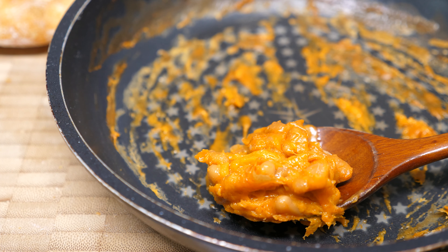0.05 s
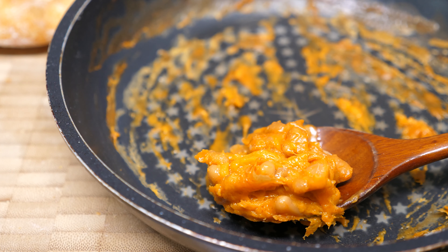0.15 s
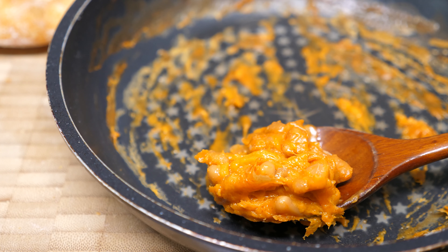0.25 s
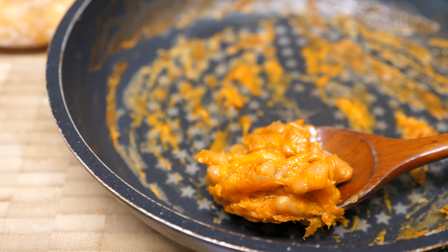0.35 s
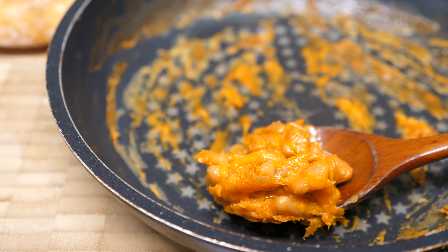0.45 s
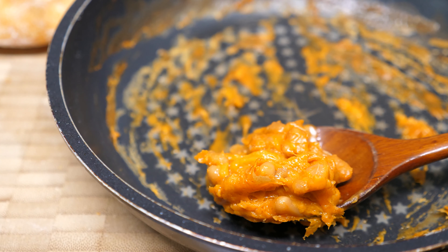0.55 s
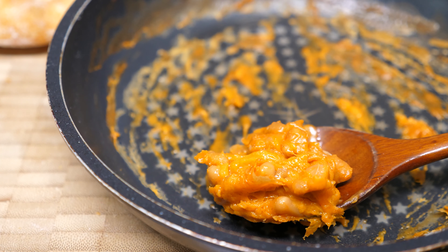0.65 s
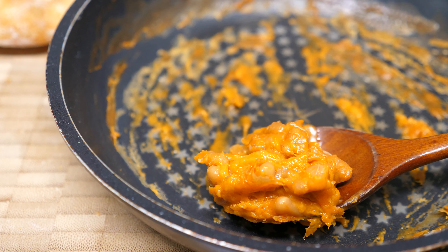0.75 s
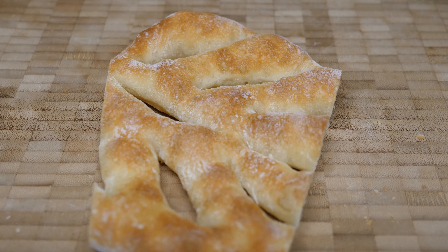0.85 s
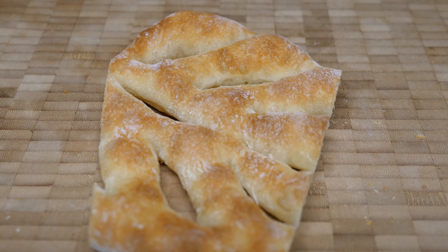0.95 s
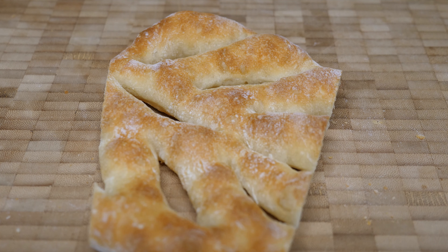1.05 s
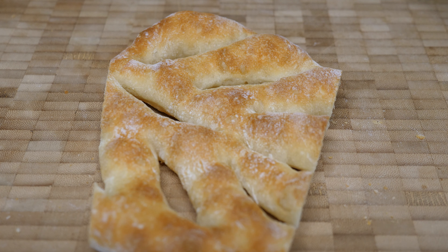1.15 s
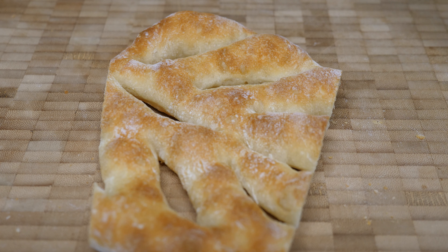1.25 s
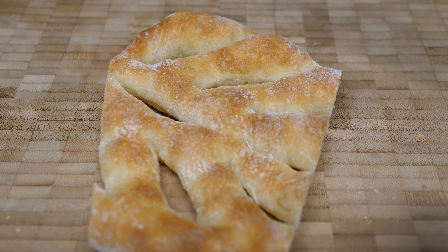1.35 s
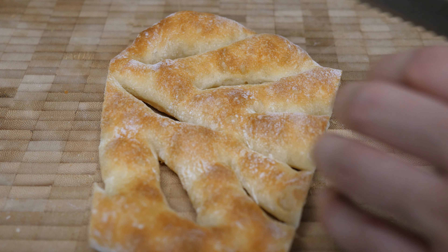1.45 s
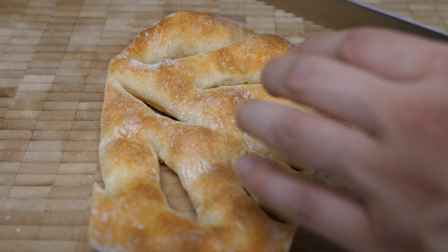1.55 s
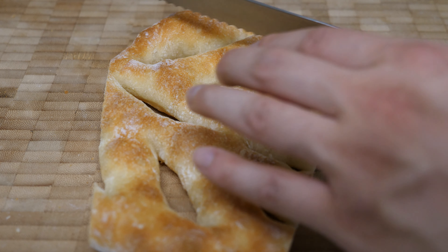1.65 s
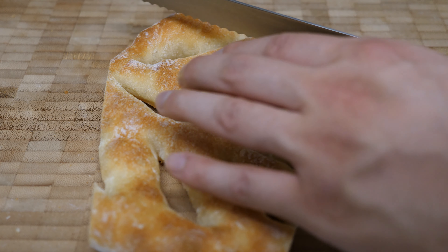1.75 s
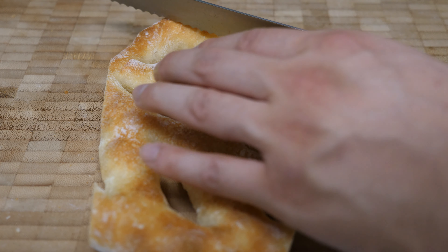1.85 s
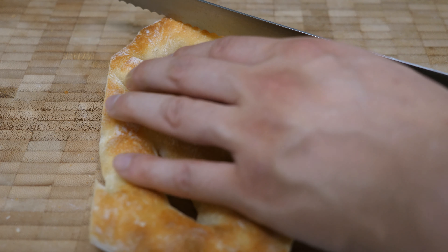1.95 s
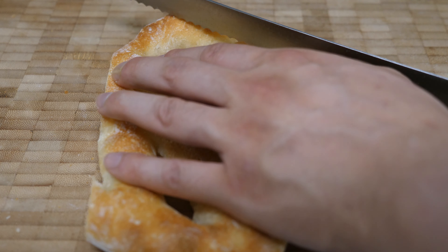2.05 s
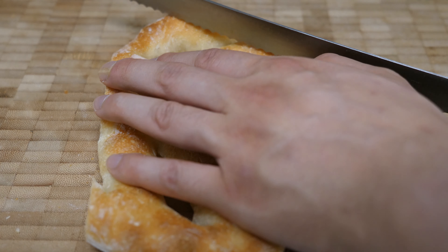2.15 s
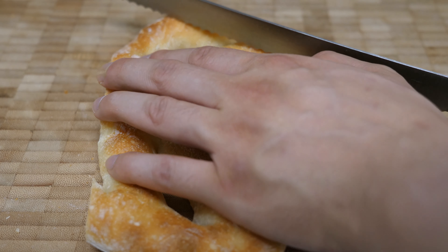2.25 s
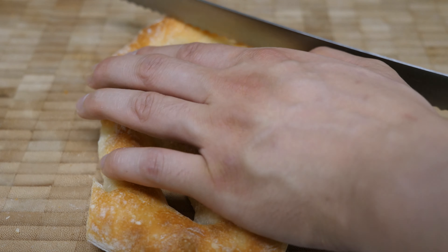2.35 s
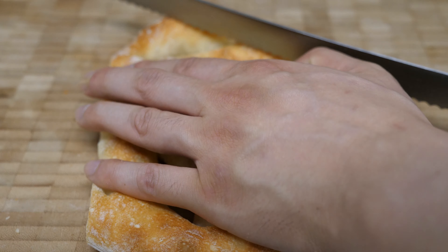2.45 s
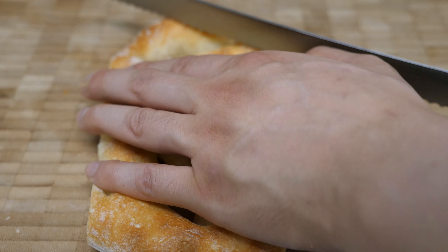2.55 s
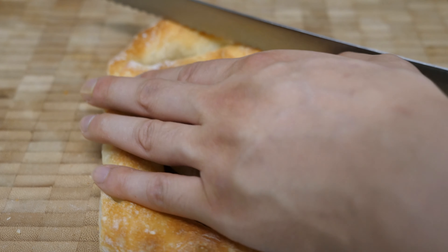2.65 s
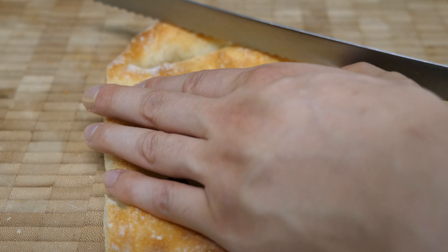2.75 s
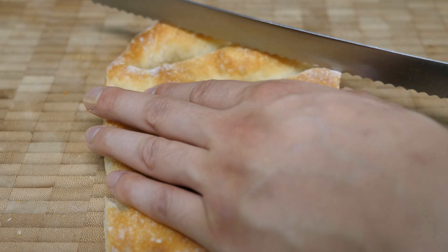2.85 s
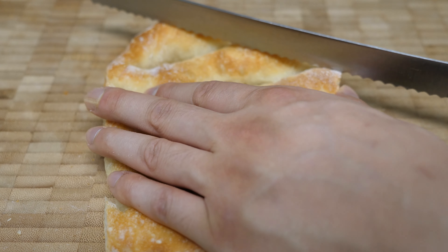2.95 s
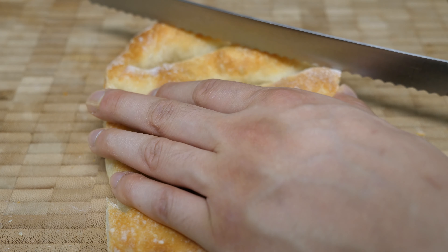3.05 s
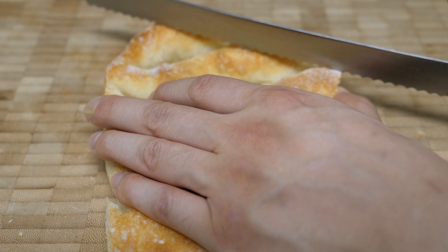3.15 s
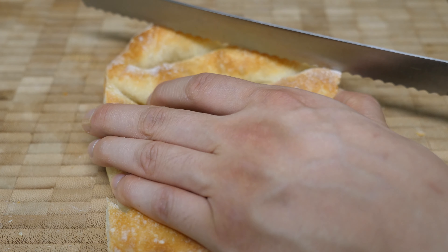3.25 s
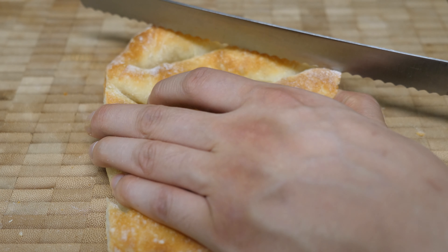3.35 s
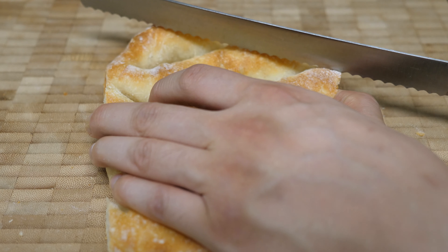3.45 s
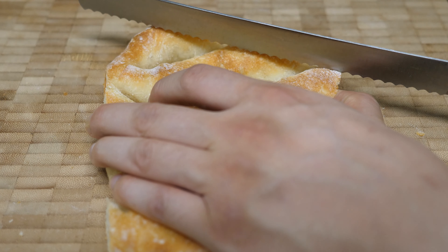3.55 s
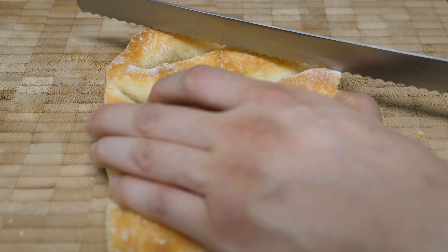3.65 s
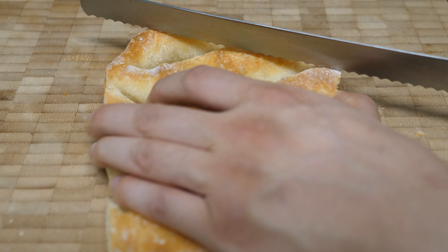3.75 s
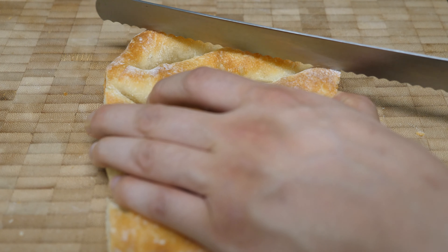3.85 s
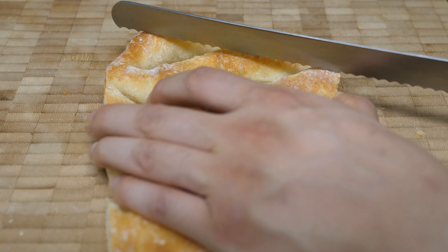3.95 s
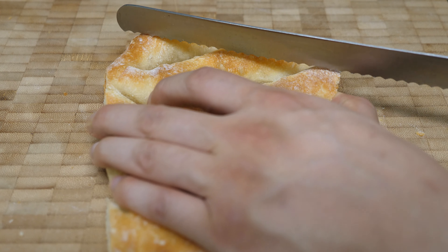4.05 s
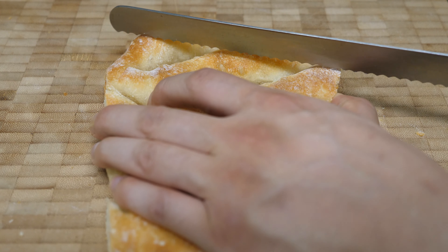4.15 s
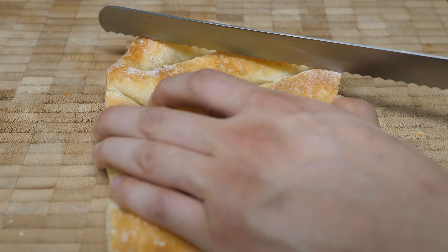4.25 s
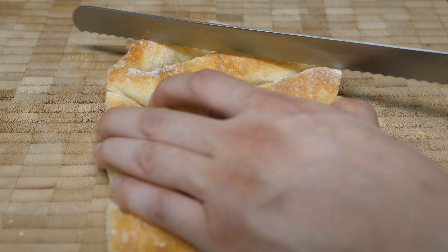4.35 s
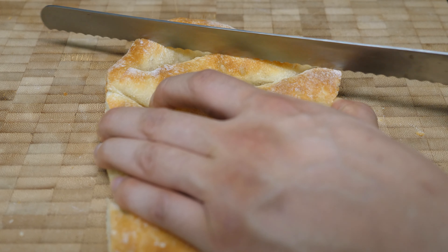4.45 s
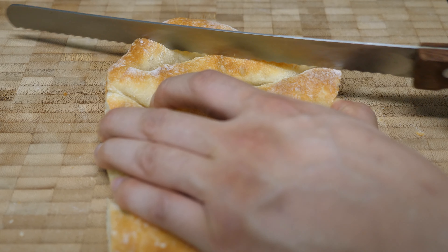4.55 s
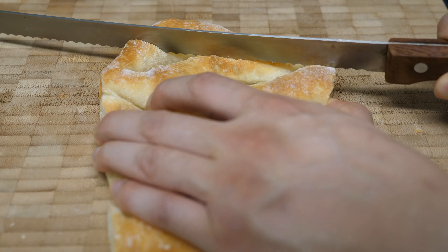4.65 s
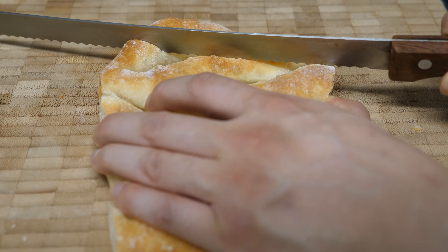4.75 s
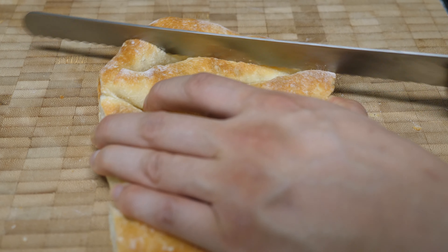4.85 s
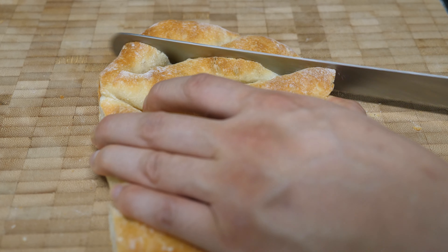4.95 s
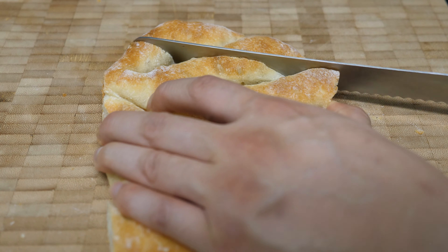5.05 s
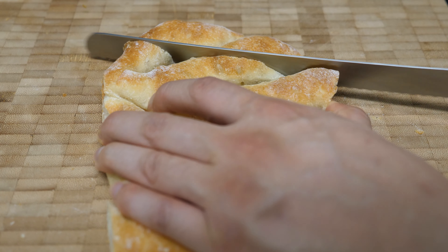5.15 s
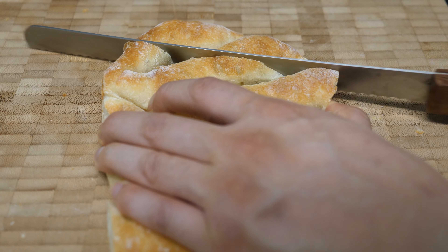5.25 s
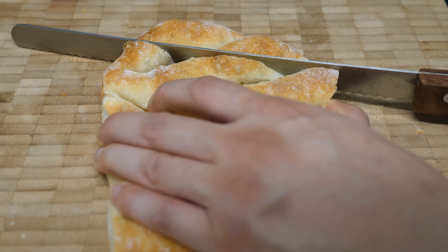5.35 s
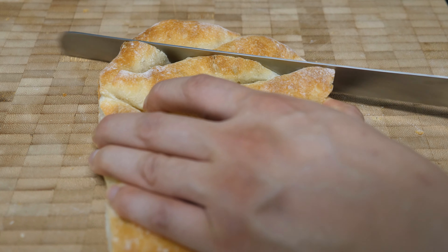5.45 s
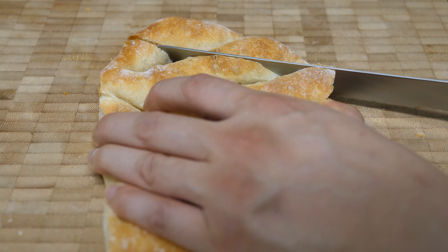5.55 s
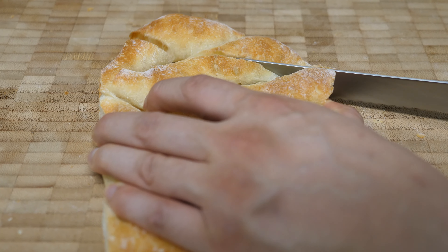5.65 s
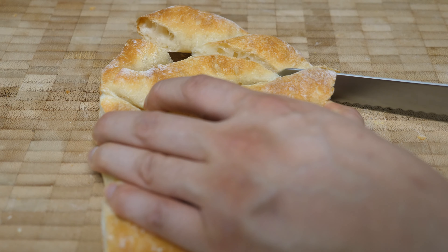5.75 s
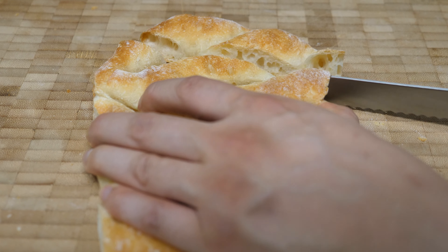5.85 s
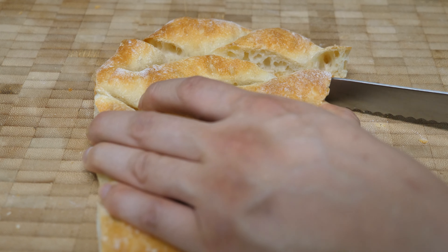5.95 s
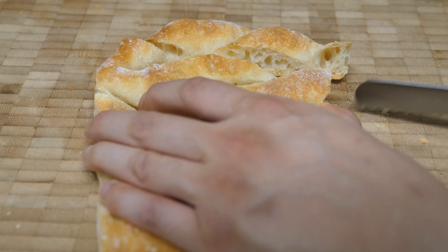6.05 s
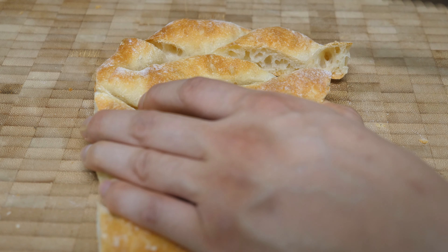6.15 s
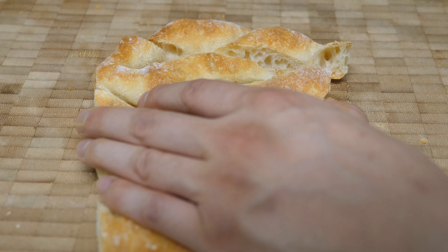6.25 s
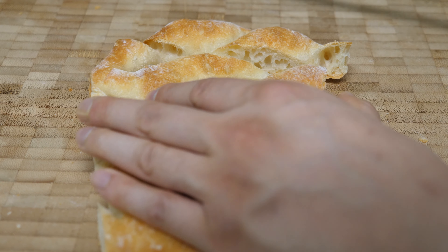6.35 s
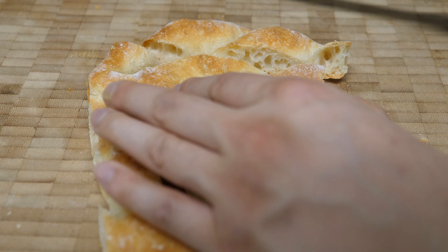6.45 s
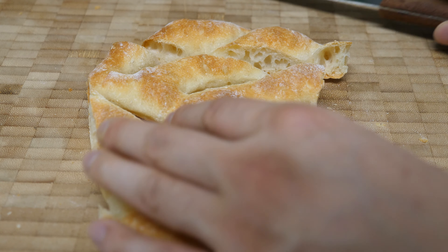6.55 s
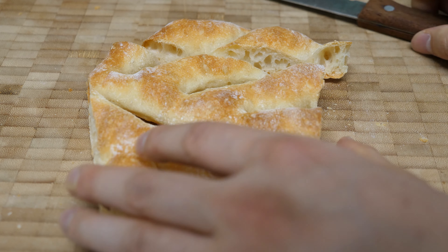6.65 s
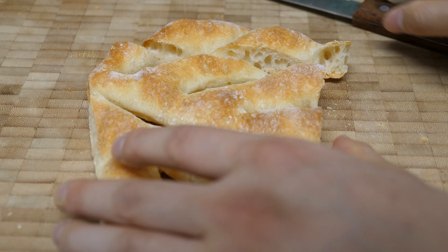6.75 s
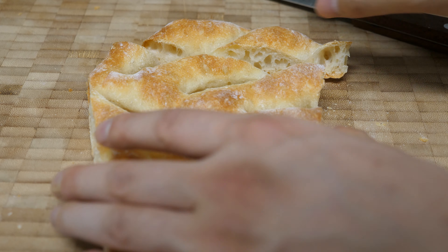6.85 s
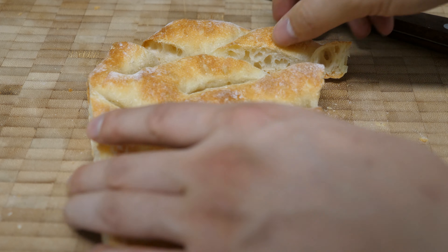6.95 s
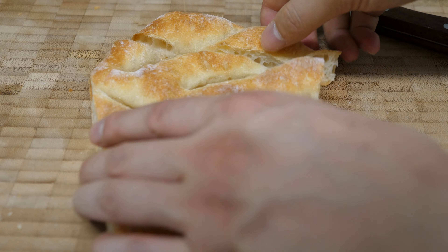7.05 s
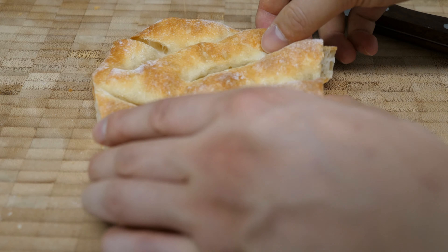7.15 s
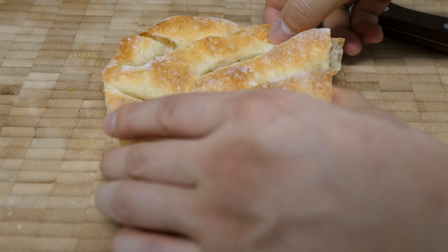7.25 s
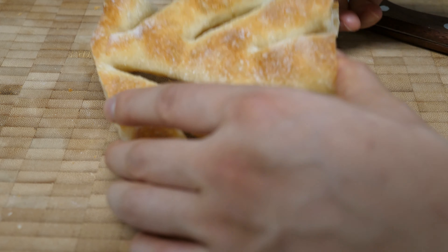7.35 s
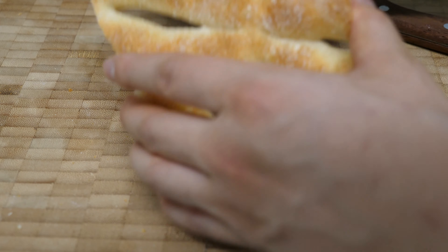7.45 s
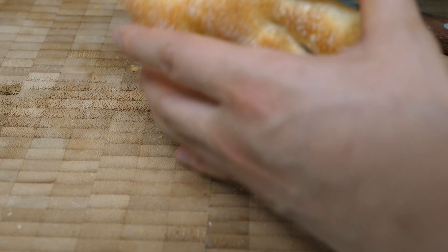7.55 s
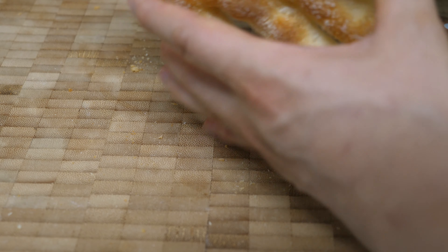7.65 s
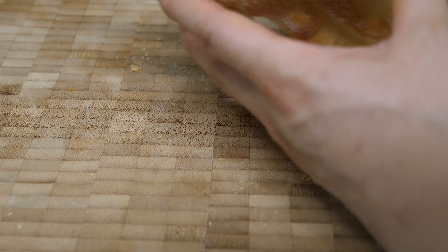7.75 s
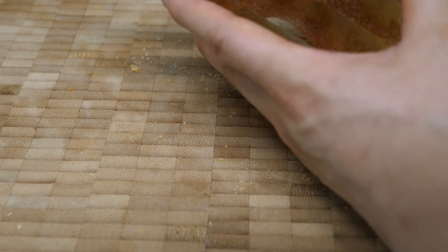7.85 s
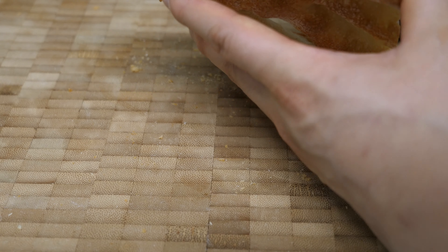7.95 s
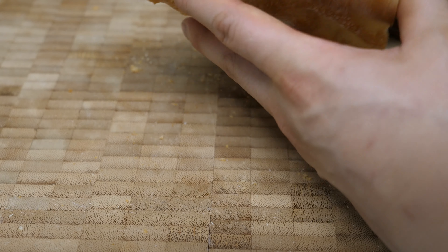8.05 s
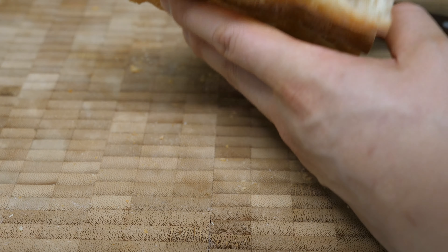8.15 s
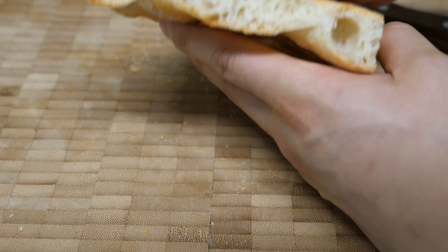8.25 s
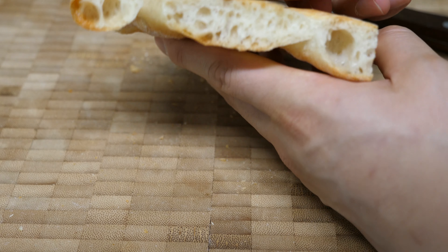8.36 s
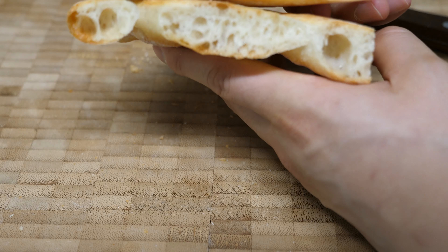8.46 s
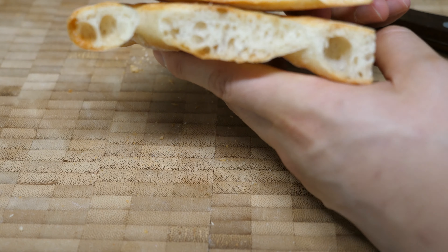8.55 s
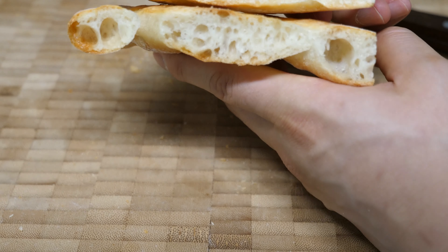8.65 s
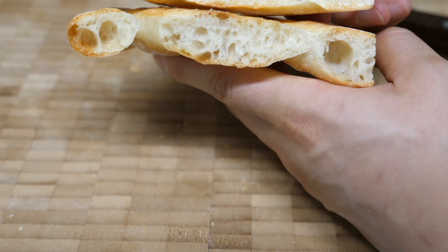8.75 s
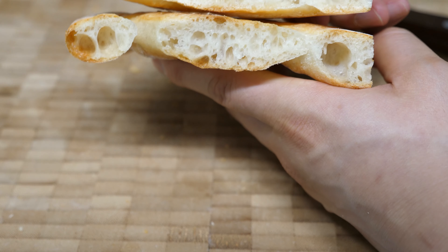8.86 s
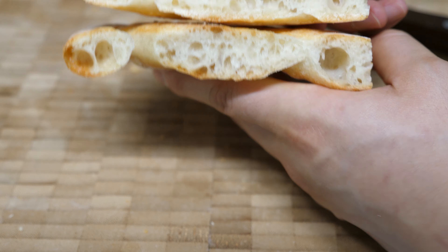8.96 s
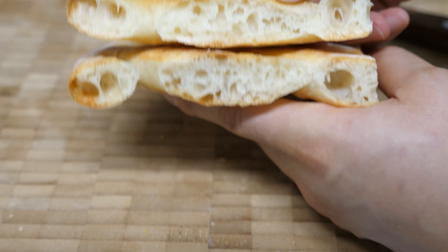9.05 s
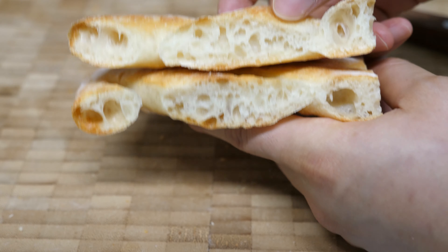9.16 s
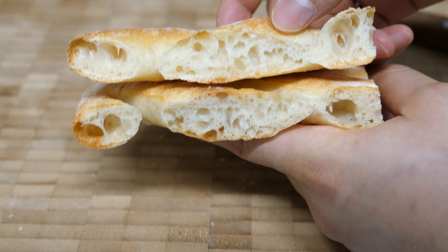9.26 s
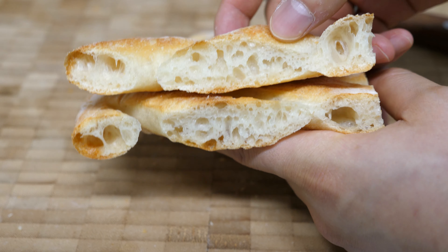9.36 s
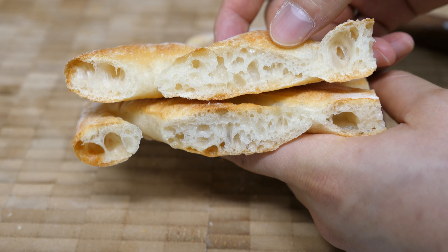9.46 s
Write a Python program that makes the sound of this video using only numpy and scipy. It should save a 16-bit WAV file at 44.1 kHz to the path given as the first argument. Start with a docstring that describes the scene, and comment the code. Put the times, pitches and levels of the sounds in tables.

```python
"""Cutting a crisp flat loaf

A serrated knife saws through a crisp flat loaf on a wooden board, close to the microphone.
A hand settles on the bread, the teeth scuff and bite, and the crust crackles through a few strokes: random
fractures ring as flakes, loaf and blade. The knife clatters down as struck modes and the halves rustle as they
are picked up, in crackle shaped by hand. A small kitchen answers with a noise tail, over a faint hum and hiss."""
import sys
import numpy as np
from scipy import signal
from scipy.fft import rfft, irfft, next_fast_len
from scipy.io import wavfile
from scipy.ndimage import map_coordinates

SR = 44100
rng = np.random.default_rng(int(sys.argv[2]) if len(sys.argv) > 2 else 0)


def generate_wav(signal):
    """Clip the signal to [-1, 1] and save it as 16-bit WAV at the path in sys.argv[1]."""
    frames = np.transpose(np.atleast_2d(signal))
    scaled = np.clip(frames, -1, 1) * 32767
    pcm = np.round(scaled).astype(np.int16)
    wavfile.write(sys.argv[1], SR, pcm)


N = 418490

# All spectra and resonance tables give relative levels; the sound they colour is levelled afterwards.
# Rumble of the wooden board. Each row: frequency in Hz, density in dB per Hz.
BOARD_SPECTRUM = [(20, -19.5), (45, -14), (78, -2), (110, -10.5), (200, -11), (500, -38), (2000, -82)]
# Sharp crack of breaking crust. Each row: frequency in Hz, density in dB per Hz.
CRACK_SPECTRUM = [(200, -32.5), (1000, -9.5), (2400, 5.5), (4000, 2), (6500, -1), (9000, -1.5),
                  (10800, -9.5), (13000, -5), (16000, -15)]
# Resonances of the serrated blade. Each row: frequency in Hz, width in Hz, strength in dB.
TEETH_MODES = [(4456, 120, 3), (5430, 79, -8), (6760, 170, -1), (9020, 320, -2), (12300, 350, -7)]


def amp(db):
    """Decibels to gain."""
    return 10 ** (np.asarray(db) / 20)


def unit(x):
    """x at rms 1."""
    return x / np.sqrt(np.mean(x ** 2) + 1e-20)


def seconds(size):
    """A time axis of this many samples."""
    return np.arange(size) / SR


def along(points, hz):
    """Read (Hz, value) points on a log frequency axis."""
    f, v = np.transpose(points)
    return np.interp(np.log(hz + 1), np.log(f + 1), v)


def wobble(rate):
    """A smooth random curve, rate knots a second."""
    knots = rng.standard_normal(int(N * rate / SR) + 4)
    return map_coordinates(knots, [seconds(N) * rate])


def add(track, s, sound):
    """Mix a sound into the track at s seconds."""
    part = track[round(s * SR):][:len(sound)]
    part += sound[:len(part)]


def colour(x, spectrum, size=8192):
    """x through the causal minimum-phase filter with this spectrum."""
    cepstrum = irfft(np.log(amp(along(spectrum, np.fft.rfftfreq(size, 1 / SR)))))
    # folding the cepstrum forward in time makes the filter causal
    cepstrum[1:size // 2] *= 2
    cepstrum[size // 2 + 1:] = 0
    impulse = irfft(np.exp(rfft(cepstrum)))
    return signal.fftconvolve(x, impulse)[:len(x)]


def noise(spectrum):
    """Coloured noise of rms 1."""
    return unit(colour(rng.standard_normal(N), spectrum))


def opening(hit):
    """A hit at rms 1 over its first 4 ms."""
    return hit / np.sqrt(np.mean(hit[:SR // 250] ** 2))


def scatter(scatter_db, t60):
    """An impulse and its dense reflections from hand, board and loaf, down 60 dB after t60 seconds."""
    t = seconds(SR // 3)
    tail = rng.standard_normal(len(t)) * amp(-60 * t / t60)
    return (t == 0) + amp(scatter_db) * tail / np.linalg.norm(tail)


def blow(spectrum, scatter_db, t60):
    """One short hit with this colour."""
    return opening(colour(scatter(scatter_db, t60), spectrum))


def ringing(modes, vary_db):
    """Damped modes, each at a new strength and sign; a wider mode dies sooner."""
    t = seconds(SR // 3)
    total = 0
    for hz, width, db in modes:
        strength = amp(db + vary_db * rng.normal()) * rng.choice([-1, 1])
        total = total + strength * np.exp(-np.pi * width * t) * np.sin(2 * np.pi * hz * t)
    return total


def fractures(rate, spread_db):
    """Random impulses, rate a second: many small ones, a few large."""
    size = amp(spread_db * np.minimum(rng.exponential(size=N), np.pi))
    breaks = rng.random(N) < rate / SR
    return unit(breaks * size * rng.choice([-1, 1], N) / np.sqrt(rate))


def crackle(rate, spread_db, count=12):
    """Flakes of many sizes break; each rings for a cycle at its own pitch and scatters along its own paths."""
    t = seconds(SR // 100)
    flakes = 0
    for hz in np.geomspace(1200, 14000, count):
        cycle = np.cos(2 * np.pi * hz * t) * np.exp(-t * hz)
        ring = signal.fftconvolve(cycle, scatter(2, t60=.025))[:SR // 30]
        flakes = flakes + signal.oaconvolve(fractures(rate / count, spread_db), ring * hz)[:N]
    return unit(flakes)


def swept(x, centre_hz, boost_db, octaves):
    """x through a broad resonance whose centre moves, one value per sample."""
    hz, t, z = signal.stft(x, SR, nperseg=1024)
    away = np.log2((hz[:, None] + 1) / np.interp(t, seconds(N), centre_hz)) / octaves
    boosted = z * amp(boost_db * np.exp(-away ** 2))
    return unit(signal.istft(boosted, SR, nperseg=1024)[1][:N])


def swell(start, rise, hold, fall, db, change_db):
    """The gain of one movement: it gathers force, holds while drifting by change_db, and dies away."""
    depth_db, rise_curve, fall_curve = 34.5, 1.9, 1.12  # the rise flattens, the fall steepens
    t = seconds(N) - start
    rising = np.maximum(1 - t / rise, 0) ** rise_curve
    falling = (np.maximum(t - rise - hold, 0) / fall) ** fall_curve
    held_db = db + change_db * np.clip((t - rise) / hold, 0, 1)
    return amp(np.maximum(held_db - depth_db * (rising + falling), -200))


def background():
    """An appliance hums in the low murk of the room, under a thin hiss."""
    # Each row: time in seconds, hiss level in dB rms.
    hiss_level = [(.912, -96), (.918, -68), (1.4, -65.5), (1.55, -70), (8.7, -71.5), (9.1, -70)]
    # Each row: frequency in Hz, density in dB per Hz; first the hiss, then the murk.
    hiss_spectrum = [(700, -48.5), (2000, -11.5), (2900, -9), (4700, -1), (8000, -8), (10500, -19.5),
                     (16000, -20.5)]
    murk_spectrum = [(10, -8.5), (26, 3), (40, -8), (85, -13), (125, -6.5), (155, -12), (230, -6.5),
                     (290, -12), (380, -12.5), (550, -16.5), (1100, -23.5), (2200, -30.5), (3500, -33.5),
                     (16000, -43.5)]
    # Each row: hum frequency in Hz, mean level in dB rms after the first second.
    hum_tones = [(119, -79), (188.4, -68), (280, -81.5)]
    t = seconds(N)
    hiss_gain = amp(np.interp(t, *np.transpose(hiss_level)))
    hum_gain = amp(-4.5 * (t < 1))  # the hum is weaker in the first second
    hum = 0
    for hz, db in hum_tones:
        phase = 2 * np.pi * hz * t + 0.375 * wobble(2)
        hum = hum + amp(db + wobble(4)) * np.sqrt(2) * np.sin(phase)
    return hum_gain * hum + amp(-65.0) * noise(murk_spectrum) + hiss_gain * noise(hiss_spectrum)


def kitchen(x):
    """The room's tail: noise that dies away at its own pace in each band, builds up in a few ms."""
    # Each row: frequency in Hz, time to fall by 60 dB in seconds.
    decay_times = [(150, 0.6), (600, 0.31), (2000, 0.24), (6000, 0.32), (15000, 0.14)]
    hz, t, z = signal.stft(rng.standard_normal(SR // 2), SR, nperseg=256)
    fading = z * amp(-60 * t / along(decay_times, hz)[:, None])
    tail = signal.istft(fading, SR, nperseg=256)[1]
    tail = tail * (1 - np.exp(-seconds(len(tail)) / 0.0029))
    return signal.fftconvolve(x, tail / np.linalg.norm(tail))[:N]


def squeak():
    """A barely audible wet squeak near the start: an unsteady gliding tone and one a fourth above."""
    # Each row: time in seconds, mean pitch in Hz, mean peak level of the lower tone in dB.
    glide = [(.1, 8000, -85), (.22, 11000, -76), (.31, 11100, -78), (0.361, 8400, -76), (.43, 7200, -73.5),
             (.48, 7000, -99), (0.552, 6400, -72), (.63, 7000, -83)]
    times, pitches, levels = np.transpose(glide)
    hz = np.interp(seconds(N), times, pitches, right=-200)  # silent by then
    db = np.interp(seconds(N), times, levels, right=-200)
    phase = 2 * np.pi * np.cumsum(hz * (1 + .035 * wobble(1800))) / SR
    overtone = np.sin(phase * 4 / 3)
    return amp(db + 2.9 * wobble(60)) * (np.sin(phase) + amp(-7) * overtone)


def bumps():
    """The soft loaf meets the board with a low thud."""
    # Each row: time in seconds, level over the first 4 ms in dB rms.
    bump_events = [(1.918, -44.5), (1.942, -43.5), (7.659, -46.5), (7.882, -52)]
    # Each row: frequency in Hz, density in dB per Hz.
    thud_spectrum = [(25, -17), (90, -19.5), (200, -20.5), (400, -20.5), (900, -27), (4000, -48.5)]
    out = np.zeros(N)
    for s, db in bump_events:
        add(out, s, amp(db) * blow(thud_spectrum, scatter_db=13.5, t60=0.046))
    return out


def handling():
    """Skin and board rub on the dry crust, loose flakes crinkle, and the finest of them fizz."""
    # Soft rubs, mostly of hands on the bread. Each row: start, rise, hold and fall in seconds, rub level in dB,
    # change over the hold in dB, rustle relative to the rub in dB, fizz relative to the rustle in dB;
    # the levels stand before the layer gains below.
    rub_events = [(.22, 0.047, 0.022, 0.055, -71.5, -1, -2, -3), (0.603, .025, .01, .06, -72, -2, -16, -5),
                  (1.332, .06, 0.046, 0.17, -73.5, -4.5, 6, -12),
                  (2.029, 0.053, 0.16, 0.23, -64, -7.5, -8, 0),
                  (2.245, 0.022, 0.0066, 0.035, -56, -1.5, -7, 6),
                  (2.32, .08, 0.037, 0.21, -63, -1, -20, -19), (2.563, 0.068, .01, 0.059, -60, 4, -14, -8),
                  (2.713, 0.019, 0.069, .09, -50.5, -8, -16, -1),
                  (2.826, 0.038, 0.027, 0.033, -63, 3, -0.5, 0),
                  (6.286, 0.015, 0.095, 0.18, -67, -4.5, -0.5, -4),
                  (6.415, 0.041, 0.012, 0.034, -59, 1.5, -17, -4.5),
                  (7.04, 0.03, 0.022, 0.14, -43, 0, -12.5, -14),
                  (7.176, 0.1, 0.016, 0.051, -50.5, 4, -11.5, -10),
                  (7.294, 0.081, 0.18, 0.13, -50.5, 3.5, -10.5, -5),
                  (7.646, 0.016, 0.066, 0.072, -58, -8, 0, -6),
                  (7.766, 0.027, .02, .07, -53, -1.5, -7, -15),
                  (7.815, 0.057, 0.015, 0.067, -53.5, -0.5, -3, 0),
                  (7.894, 0.053, .015, 0.047, -51, 1.5, -5.5, 2),
                  (7.947, 0.13, 0.058, 0.17, -52.5, 1.5, -3.5, 4),
                  (8.238, 0.02, 0.024, .08, -55, -4.5, -8.5, 2),
                  (8.316, 0.031, 0.11, 0.059, -57, -4.5, -5.5, 1), (8.575, .04, .01, 0.06, -65, 2, -8, -8),
                  (8.947, 0.072, 0.038, 0.21, -64.5, 1, -7, -4),
                  (9.1, 0.077, 0.023, 0.63, -61, -1, -10.5, 1)]
    # Each row: frequency in Hz, density in dB per Hz; the dull rub, the rustling flakes, the finest fizz.
    rub_spectrum = [(120, -25.5), (200, -9.5), (357, -10), (419, -8), (892, -0.5), (1090, -4.5),
                    (1680, -5.5), (2200, -9), (5000, -19), (6500, -39.5), (11000, -120)]
    rustle_spectrum = [(1000, -31), (3000, -2), (4500, -1), (6000, -2.5), (9000, -1.5), (11000, -13.5),
                       (13500, -18), (16000, -28)]
    powder_spectrum = [(6000, -43), (10500, -15), (13500, 2), (15000, -4), (16000, -9.5)]
    rub = crisp = fine = 0
    for *movement, rustle_db, fizz_db in rub_events:
        force = swell(*movement)
        rub = rub + force
        crisp = crisp + force * amp(rustle_db)
        fine = fine + force * amp(rustle_db + fizz_db)
    grip = amp(1.55 * wobble(55))
    body = unit(colour(fractures(rate=1500, spread_db=1.0) * grip, rub_spectrum))
    flakes = crackle(1100, spread_db=5.5) * grip
    body = body + amp(-24.5) * noise(BOARD_SPECTRUM)  # the board rumbles under the hand
    rustle = unit(colour(flakes, rustle_spectrum))
    fizz = unit(colour(flakes, powder_spectrum))
    return rub * body + amp(-0.5) * crisp * rustle + amp(-8) * fine * fizz


def knife_down():
    """Every contact knocks the wood; where the steel touches, the blade clinks as well."""
    # The knife taps the board, later lands and rocks on it. Each row: time in seconds, knock in dB,
    # steel relative to the knock in dB; both before the gains of their parts.
    contacts = [(2.664, -35, -8), (6.5434, -26, 7), (6.553, -25, 2.5), (6.5634, -24, -4), (6.5812, -27, -7),
                (6.661, -36, -12), (6.6752, -35, -16), (6.6879, -32.5, -10), (6.694, -36.5, -12),
                (6.7258, -28, -6), (6.7356, -28, -14.5)]
    # Each row: frequency in Hz, density in dB per Hz; the knock on wood, then the steel edge.
    knock_spectrum = [(25, -46.5), (110, -35), (220, -6), (320, -5), (450, -12), (700, 1.5), (1100, 5.5),
                      (1650, 7), (2400, -13), (4000, -12.5), (9000, -32)]
    edge_spectrum = [(1000, -42), (2200, 11.5), (3200, -0.5), (5200, -0.5), (7000, -6), (9000, -8.5),
                     (11000, -28), (16000, -31)]
    # Each row: frequency in Hz, width in Hz, strength in dB; modes of the wood, then of the blade.
    wood_modes = [(226, 19, -10), (309, 19, -14), (514, 23, -17.5), (824, 160, -18.5), (1092, 46, -0.5),
                  (1560, 120, 1), (1695, 80, 2), (3870, 130, -0.5), (5850, 99, -10.5)]
    blade_modes = [(2030, 450, -0.5), (3150, 36.4, 16), (4150, 16, -10.5), (4420, 41, -17), (5500, 20, -26),
                   (5070, 160, 7.5), (7700, 45, -14)]
    out = np.zeros(N)
    for s, db, steel_db in contacts:
        knock = amp(-4) * blow(knock_spectrum, scatter_db=7, t60=.05)
        knock = knock + amp(-4.5) * opening(ringing(wood_modes, vary_db=2))
        clink = amp(-.5) * blow(edge_spectrum, scatter_db=6, t60=.05)
        clink = clink + amp(-10) * opening(ringing(blade_modes, vary_db=3))
        add(out, s, amp(db) * knock)
        add(out, s, amp(db + steel_db) * clink)
    return amp(-0.5) * out


def scuffs():
    """The blade brushes the crust while it looks for its place; its teeth ring when they slip free."""
    # Each row: middle in seconds, level of the rub at its peak in dB, half length in seconds,
    # ring of the blade relative to the crust in dB.
    scuff_events = [(2.695, -61, 0.016, -20), (2.729, -42, 0.0083, -10.5), (3.199, -44, 0.0093, -4.5),
                    (3.269, -57, 0.017, -7), (3.317, -46, 0.0085, -3.5), (3.42, -58.5, 0.0052, 11)]
    # Each row: frequency in Hz, density in dB per Hz.
    scuff_spectrum = [(100, -28), (330, 6), (1200, 3), (2200, -1.5), (3300, -8), (4500, -13.5), (5300, -5),
                      (9000, -11.5), (11000, -20.5), (16000, -16)]
    out = np.zeros(N)
    t = seconds(SR // 5)
    for s, db, half, ring_db in scuff_events:
        bell = np.exp(-.5 * (t / half - np.pi) ** 2)  # peaks pi half lengths in
        rub = amp(db) * bell * rng.standard_normal(len(t))
        crust = colour(rub, scuff_spectrum)
        steel = signal.fftconvolve(rub, ringing(TEETH_MODES, vary_db=0))[:len(t)]
        level = np.sqrt(np.mean(rub ** 2))
        add(out, s - np.pi * half, level * (unit(crust) + amp(ring_db) * unit(steel)))
    return out


def snaps():
    """A larger piece of crust gives way: a sharp crack and the duller answer of the loaf.

    The dull row at 3.051 s is made the same way but is the blade knocking on the board."""
    # Each row: time in seconds, crack in dB, body relative to the crack in dB; before the trims below.
    snap_events = [(1.9183, -46.5, 5.5), (2.0353, -60.5, 7.5), (2.6385, -51.5, -1), (3.051, -60.5, 15.5),
                   (3.416, -46.5, -7), (4.176, -40.5, 0), (4.2427, -37, 0.5), (4.271, -40, 2),
                   (4.2926, -41, 0), (4.3063, -41, 1), (4.3292, -34.5, -2), (4.3667, -30.5, 5.5),
                   (4.3975, -25, -2), (4.4205, -26.5, 2.5), (4.4618, -35.5, 5), (4.4711, -34.5, 8),
                   (4.4789, -29, 3.5), (4.4878, -29.5, 0.5), (4.6324, -32.5, 2.5), (4.6633, -29.5, 1),
                   (4.6759, -31.5, -6), (4.7333, -41, 1), (4.7838, -40, -11), (4.817, -46.5, -3),
                   (4.8384, -39, -3), (4.9464, -32.5, 10.5), (5.0052, -30.5, -8), (5.0392, -29, -18),
                   (5.0513, -27.5, -28), (5.1043, -39, -3), (5.149, -36, -15), (5.189, -29.5, -24),
                   (5.575, -32, -2), (5.625, -25.5, -24), (5.7059, -30, -7), (5.7905, -35.5, -14),
                   (5.8394, -45, -4), (6.0296, -53.5, 8), (7.0476, -54, -9), (7.0941, -55.5, 18),
                   (7.4452, -55, 15), (7.659, -53, -19), (7.7936, -53, -9), (8.4162, -53, 2)]
    # The loaf's answer. Each row: frequency in Hz, density in dB per Hz.
    chip_spectrum = [(60, -21), (250, 7), (600, 9.5), (1000, 14.5), (1900, 7), (3000, -45), (8000, -115)]
    out = np.zeros(N)
    for s, db, body_db in snap_events:
        crack = blow(CRACK_SPECTRUM, scatter_db=3.5, t60=.03)
        body = blow(chip_spectrum, scatter_db=6, t60=.04)
        add(out, s, amp(db + 0.5) * crack + amp(db + body_db - 3.0) * body)
    return out


def sawing():
    """Teeth catch and slip: the loaf rasps, crust flakes break, the blade sings, the board rumbles under the push."""
    # Saw strokes. Each row: start, rise, hold and fall in seconds, rasp in dB, change over the hold in dB,
    # crust and board relative to the rasp in dB, ring of the cut in Hz before it wanders;
    # the levels stand before the layer gains below.
    strokes = [(3.746, 0.12, 0.1, 0.077, -45.5, -5.5, -14.5, -15, 824),
               (3.881, 0.079, 0.12, 0.017, -45.5, -2.5, -12, -14.5, 780),
               (4.10, 0.35, 0.019, .10, -36, 7.5, -7.5, -15.5, 1050),
               (4.45, .08, 0.13, 0.08, -37, 7.5, -9.5, -20.5, 400),
               (4.803, 0.12, 0.11, 0.067, -30, -2, -3.5, -10, 860),
               (5.062, 0.17, 0.094, 0.14, -36, 0, -6.5, -14.5, 646),
               (5.44, 0.1, 0.21, 0.12, -29, -7.5, -7, -22.5, 804),
               (5.699, 0.074, 0.16, 0.11, -42.5, -6.5, -3, -11.5, 830),
               (6.001, 0.081, 0.02, 0.035, -50.5, -0.5, -11.5, -19, 596)]
    # Hollow of loaf and board. Each row: frequency in Hz, width in Hz, mean strength in dB.
    hollow_modes = [(400, 77, -6.5), (864, 210, -24), (1332, 4.7, 9.5), (1627, 150, 4.5), (2518, 120, 0.5),
                    (2570, 19, -29)]
    # Each row: frequency in Hz, density in dB per Hz; the rasping loaf, then the breaking crust.
    loaf_spectrum = [(60, -21), (140, -25.5), (220, -1.5), (280, -1), (420, -1.5), (850, -1), (1300, -2.5),
                     (2400, -9), (4000, -21), (9000, -27.5)]
    crust_spectrum = [(200, -40.5), (900, -10.5), (2500, 1.5), (4000, -3.5), (5200, -4.5), (6800, -7),
                      (8800, -4), (10800, -14), (13000, -16), (16000, -12.5)]
    rasp = crisp = push = ring = 0
    for *movement, crust_db, board_db, ring_hz in strokes:
        force = swell(*movement)
        rasp = rasp + force
        crisp = crisp + force * amp(crust_db)
        push = push + force * amp(board_db)
        ring = ring + force * ring_hz
    # the ring of the cut shifts as the teeth move on, by about 0.05 octaves
    cut_hz = ring / rasp * 2 ** (0.05 * wobble(12))
    # the teeth catch fast, the arm pushes unevenly; this drives loaf and crust together
    catch = amp(0.26 * wobble(90) + 0.6 * wobble(25))
    slips = fractures(rate=3000, spread_db=4.5) * catch

    cavity = unit(signal.oaconvolve(slips, ringing(hollow_modes, vary_db=-11.0))[:N])
    loaf = unit(colour(slips, loaf_spectrum)) + amp(-13.5) * cavity
    loaf = swept(loaf, cut_hz, boost_db=3.2, octaves=0.417)

    rate = 1100 + 2200 * crisp / crisp.max()  # a harder stroke breaks more flakes
    flakes = crackle(rate, spread_db=5.5)
    splinters = fractures(rate=100, spread_db=1)  # smaller cracks under a stroke
    cracks = signal.oaconvolve(splinters, scatter(scatter_db=3.0, t60=0.023))[:N]
    crust = unit(colour(flakes * catch, crust_spectrum)) + amp(-12) * unit(colour(cracks, CRACK_SPECTRUM))

    blade = unit(signal.oaconvolve(slips, ringing(TEETH_MODES, vary_db=2.5))[:N])
    singing = amp(-36) * rasp ** 0.6 * blade  # gains 0.6 dB per dB of rasp
    rumble = amp(-3.5) * push * noise(BOARD_SPECTRUM)
    return amp(-1.5) * rasp * loaf + amp(2.0) * crisp * crust + singing + rumble


def scene():
    """Bread and knife close by, the room around them."""
    bread = sawing() + snaps() + scuffs() + handling() + bumps()
    knife = knife_down()
    room = kitchen(amp(-13) * bread + amp(-10) * knife)
    return (bread + knife + room + squeak() + background())[None]


def record(dry):
    """The recorder keeps nothing above its band limit of 15820 Hz."""
    size = next_fast_len(N + SR // 2)
    kept = np.fft.rfftfreq(size, 1 / SR) < 15820
    return irfft(rfft(dry, size) * kept, size)[:, :N]


dry = scene()
out = record(dry)
generate_wav(out)
```